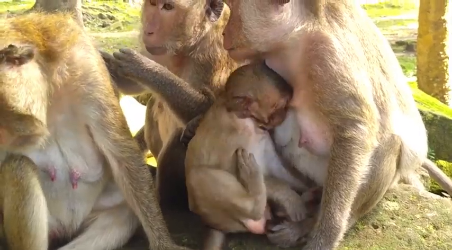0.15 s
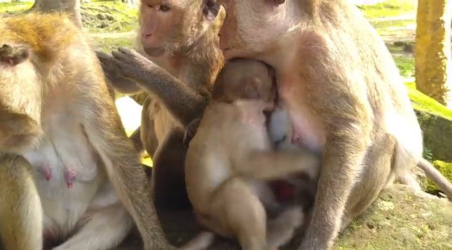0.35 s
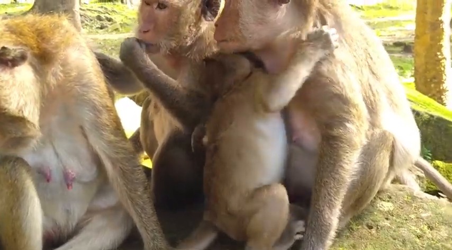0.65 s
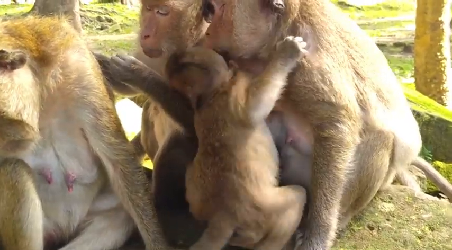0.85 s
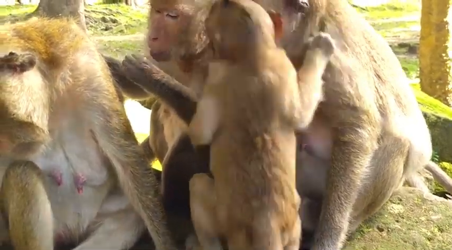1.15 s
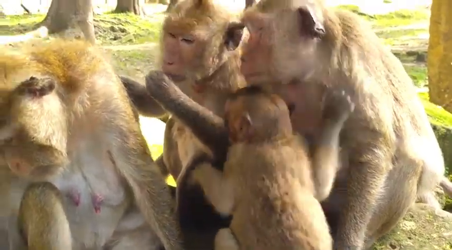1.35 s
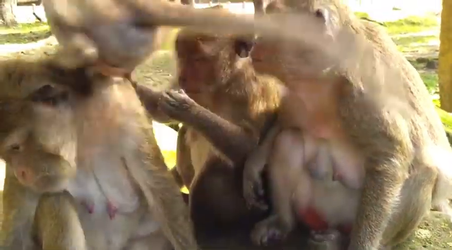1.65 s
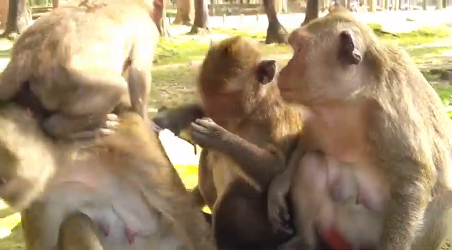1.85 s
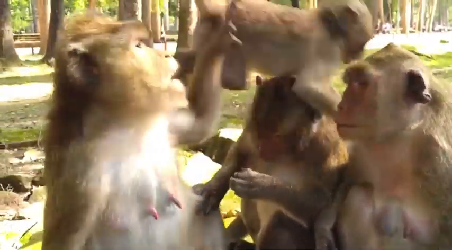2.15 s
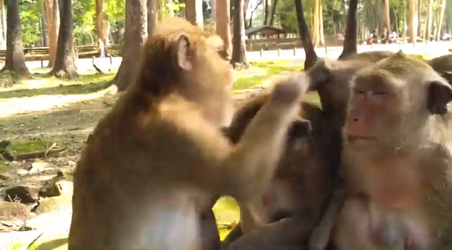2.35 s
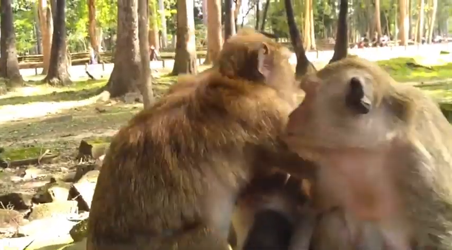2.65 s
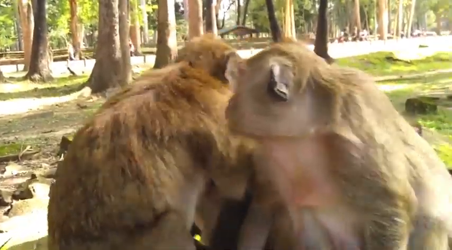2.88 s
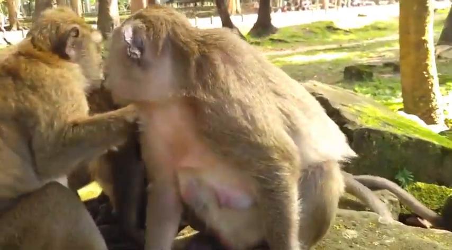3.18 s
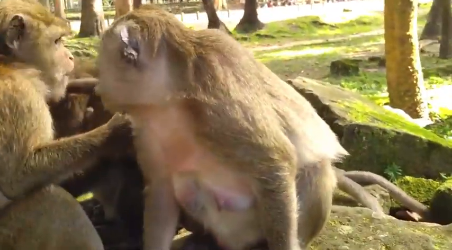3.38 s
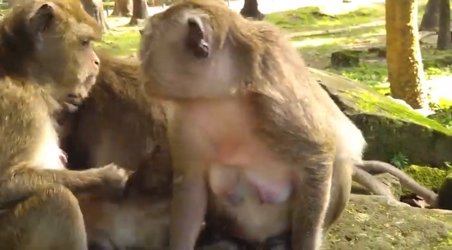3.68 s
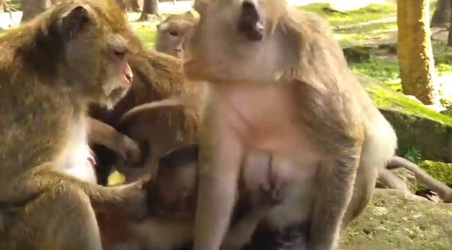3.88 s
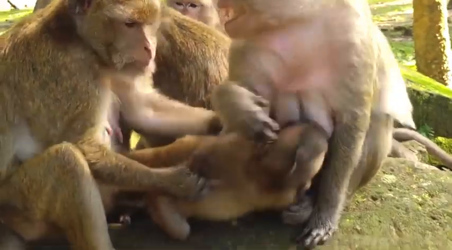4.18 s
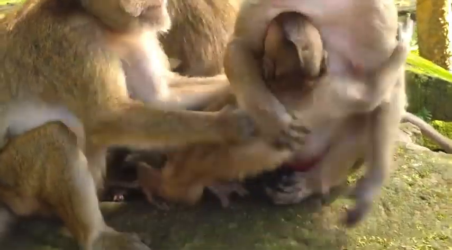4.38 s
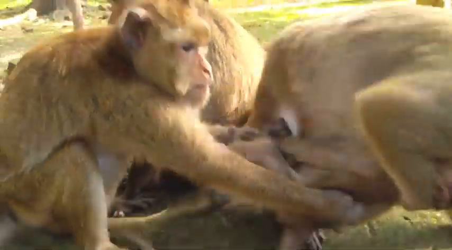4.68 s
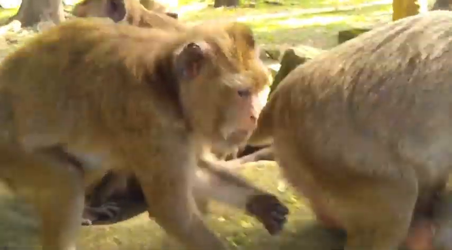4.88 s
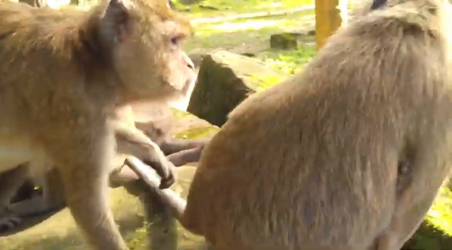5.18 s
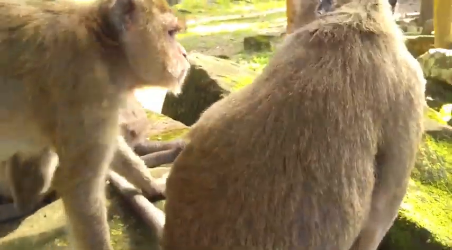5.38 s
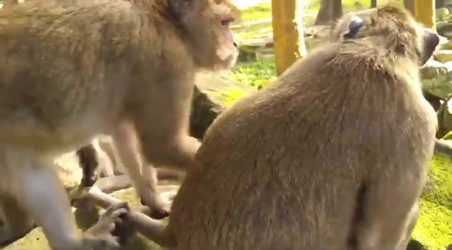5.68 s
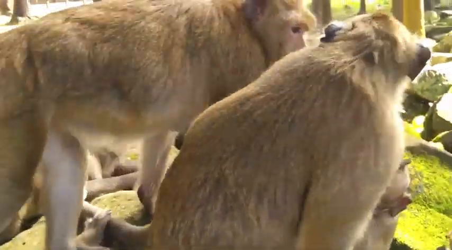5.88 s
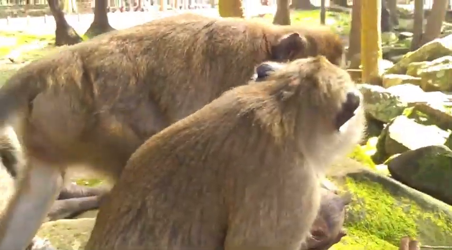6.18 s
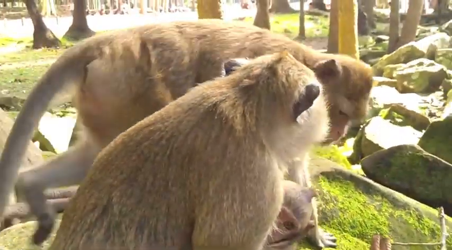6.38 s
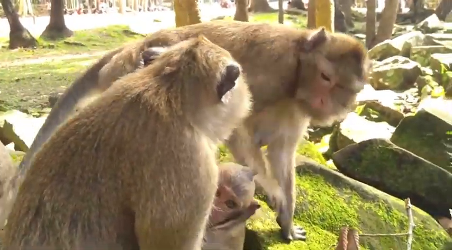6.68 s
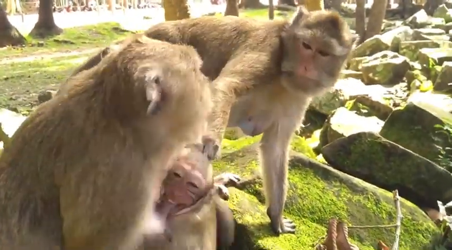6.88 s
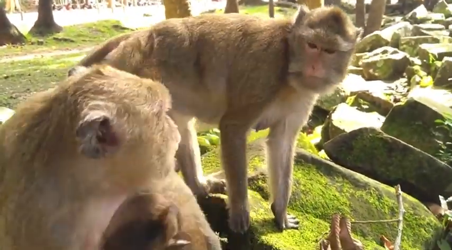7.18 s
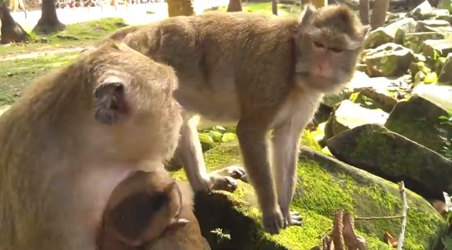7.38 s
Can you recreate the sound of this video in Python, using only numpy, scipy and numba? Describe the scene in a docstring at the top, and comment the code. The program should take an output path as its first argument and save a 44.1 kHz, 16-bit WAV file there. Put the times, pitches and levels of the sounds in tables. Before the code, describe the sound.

A young macaque close by lets out bursts of harsh, raspy screeches and tiny squeaks, over a faint low hum of distant traffic.

```python
"""Young macaque, close, wooded park

A young macaque screeches and squeaks at arm's length from a pair of microphone ports.
Its vocal folds blend a clear whistle-like tone (harmonics) with a chaotic rasp (uneven pulses and air noise).
The ground and bodies nearby echo at once; trunks and rocks send back a short tail of dying noise.
Fur and paws rustle now and then in puffs of noise; far traffic hums and rumbles behind in bands of noise."""
import sys
import numpy as np
from scipy import signal
from scipy.io import wavfile
from scipy.ndimage import map_coordinates
from numba import njit

SR = 44100
rng = np.random.default_rng(int(sys.argv[2]) if len(sys.argv) > 2 else 0)


def unload_audio(sound):
    """Save the sound as a 16-bit wav file, at the path given as the first command line argument."""
    columns = np.transpose(np.atleast_2d(sound))
    # keep every value between -1 and 1, then stretch to whole-number steps
    steps = np.round(np.clip(columns, -1, 1) * 32767)
    wavfile.write(sys.argv[1], SR, steps.astype(np.int16))


N = 332514   # length [samples]

# Short clear squeaks: (start [s], length [s], loudest point [share of length], first pitch [Hz],
# pitch at the loudest point [Hz], last pitch [Hz], top level [dB], shrillness [dB])
SQUEAKS = [(2.779, 0.023, .5, 2800, 2730, 2730, -42.5, -17), (3.416, 0.057, .7, 3470, 4080, 3900, -47, 8),
           (3.644, .03, 0.5, 1180, 1916, 4420, -39.5, -32), (3.677, 0.039, 0.1, 4160, 4700, 3350, -49, -10),
           (3.809, .03, 0.53, 3520, 3880, 3280, -51, -13), (4.003, .03, 0.6, 4760, 4100, 4100, -59, -12),
           (4.033, 0.015, 0.63, 2205, 2113, 1830, -37, -47),
           (5.16, 0.01, 0.38, 1140, 1250, 1250, -45, -37.5), (5.51, 0.019, .5, 2070, 2260, 2350, -53, -27),
           (5.536, 0.019, 0.48, 2500, 2000, 1680, -40, -45),
           (5.797, .016, 0.7, 1130, 1243, 1100, -25.5, -15.5),
           (5.809, 0.013, .4, 1152, 1070, 957, -28, -17),
           (6.844, 0.049, 0.95, 4050, 3750, 3630, -52.5, -23),
           (6.893, 0.0041, 0.7, 2590, 2500, 2550, -34, -30),
           (6.898, 0.035, 0.5, 4160, 4140, 4010, -34.5, -1), (6.93, .03, 0.3, 3600, 3750, 3900, -34, -15)]
SQUEAK_ROUGH, SQUEAK_EDGE_DB = .12, -16.5   # roughness 0-1; both ends relative to the top
# Throat colour of all squeaks, in the order of SCREECH_COLOUR from its second column on: [dB]
SQUEAK_THROAT_DB = (0.5, -23, -0.5, -6, -32)

# Effort, one list per screech: (time [s], level [dB], shrillness [dB])
SCREECH_EFFORT = [
    [(2.8, -31.5, -25.5), (2.814, -25, -17.5), (2.826, -24.5, -15.5), (2.838, -39.5, -40.5)],
    [(2.903, -29.5, -29), (2.909, -26, -14.5), (2.921, -17.5, -12), (2.959, -12, -6), (3.007, -16.5, -8),
     (3.021, -8, -22), (3.027, -16.5, -20.5), (3.038, -35.5, -19)],
    [(3.135, -47, -15), (3.139, -29.5, -22), (3.151, -29, -28), (3.177, -19.5, -4), (3.185, -19.5, -7),
     (3.203, -15.5, 11), (3.221, -16.5, 4), (3.267, -19.5, -8.5), (3.28, -41, 3)],
    [(3.458, -40, -7), (3.47, -38.5, -16), (3.496, -31, -10), (3.51, -31, -1), (3.522, -35.5, -7),
     (3.536, -25, -22), (3.546, -39.5, -10), (3.56, -47, -7)],
    [(4.214, -44.5, -1.5), (4.218, -33, -2), (4.248, -12, -1), (4.256, -9.5, 4), (4.318, -12.5, -33.5),
     (4.326, -21, -19.5), (4.33, -36, -19.5)],
    [(4.408, -49.5, -18), (4.42, -19, -39), (4.432, -22.5, -6), (4.448, -17.5, 0.5), (4.458, -22, 5.5),
     (4.474, -13, 7), (4.52, -14.5, -20), (4.528, -45.5, -17.5)],
    [(4.622, -40.5, -14), (4.64, -21, 0), (4.66, -11, -3), (4.696, -8, 2), (4.736, -14.5, -0.5),
     (4.758, -10.5, -11), (4.776, -30, -41), (4.783, -26, -18)],
    [(5.306, -45.5, -16), (5.32, -30.5, -12), (5.35, -29.5, 5.5), (5.364, -19.5, -8), (5.376, -32, 4),
     (5.396, -30, -18), (5.404, -26.5, -27), (5.408, -47, -17)],
    [(6.921, -34.5, -30.5), (6.931, -21, -20), (6.947, -22.5, -7), (6.983, -12, 3.5), (7.013, -16, -15),
     (7.025, -37.5, -4.5)],
]
# Vocal folds, one list per screech: (time [s], pitch [Hz], roughness [0-1, clipped above])
SCREECH_FOLDS = [
    [(2.8, 2237, .6), (2.812, 2450, .37), (2.828, 2390, .37), (2.838, 1996, .6)],
    [(2.903, 1095, .4), (2.915, 1430, .5), (2.93, 1505, .72), (2.965, 1404, .93), (3.018, 1350, 0.82),
     (3.028, 1150, 0.49), (3.038, 850, 0.2)],
    [(3.135, 1891, .4), (3.155, 2590, 0.64), (3.19, 2650, 0.84), (3.2, 2575, .95), (3.235, 2598, 1.17),
     (3.245, 2507, 0.6), (3.265, 2100, 0.6), (3.28, 1600, 0)],
    [(3.458, 1234, .3), (3.495, 1325, 0.31), (3.515, 1384, 0.28), (3.527, 1420, .6), (3.54, 1269, .6),
     (3.56, 1240, .9)],
    [(4.214, 3134, .07), (4.221, 3315, .13), (4.238, 2321, .4), (4.255, 2161, .22), (4.262, 2150, .75),
     (4.302, 1861, 0.7), (4.305, 1410, .5), (4.33, 1308, .3)],
    [(4.408, 2595, .05), (4.428, 3766, .4), (4.44, 3024, .9), (4.452, 1927, .2), (4.474, 2081, .4),
     (4.485, 2200, .8), (4.505, 2300, 1.08), (4.518, 2800, 0.5), (4.528, 2000, 0.72)],
    [(4.622, 1612, 0.5), (4.643, 2097, .6), (4.652, 1940, 1.04), (4.738, 1877, 0.93), (4.745, 2646, 0.56),
     (4.765, 2588, 0.3), (4.77, 1780, 0.2), (4.783, 1650, 0.32)],
    [(5.306, 720, .5), (5.325, 930, .4), (5.335, 890, 0.62), (5.355, 885, 0.58), (5.365, 934, 0.41),
     (5.388, 1080, 0.47), (5.4, 677, .1), (5.408, 610, .1)],
    [(6.921, 2500, 0), (6.935, 2600, 0.59), (6.964, 2560, .5), (6.972, 3050, 0.82), (7.0, 2884, .85),
     (7.017, 2662, 0.8), (7.025, 2000, .5)],
]
# Harmonic to which the clear voice tunes the mouth, one per screech: [harmonic number]
MOUTH_HARMONIC = [1, 2, 1, 2, 2, 1, 1, 3, 1]
# Vocal tract, one row per screech: (wide-open mouth [Hz], throat near 1.9 kHz [dB],
# near 1 kHz, rasp only [dB], near 3.8 kHz [dB], air above 8 kHz [dB], half-pitch lines [dB])
SCREECH_COLOUR = [(2297, -4.5, -5.5, -7.5, -5.5, -15.5), (2970, -12, -17, -9.5, -2, -20.5),
                  (2690, -7.5, -20, -1, 10.5, -2.5), (2630, -6.5, -11, -6, 15, -20),
                  (2800, -11.5, -38.5, -1.5, 13, -9), (2922, -5, -31, -3.5, 6, -4),
                  (2950, -20, -34, -0.5, 5.5, -0.5), (2720, -5.5, -28, -5, 12.5, -20),
                  (3130, -5, -32.5, -1.5, 0, -10)]

MOUTH_WIDTH_HZ, LOW_THROAT_HZ, MID_THROAT_HZ = 450, 1960, 3750
# Upper throat resonances, scaled by shrillness: (centre [Hz], width [Hz], relative level [dB])
UPPER_THROAT = [(4720, 1300, -8), (6400, 800, -5), (7260, 1100, -1.5)]
LEAK_DB = -40.5   # passes between the resonances of the clear voice, at the second harmonic
OPEN_AT_ROUGH = .85   # roughness at which the mouth is wide open
MOUTH_SHAKE, AIR_PER_DB = 0.031, .5   # mouth waver [share at full roughness]; air [dB per dB shrillness]

# Where the caller sits: (time [s], left lags right [ms], left minus right [dB])
CALLER_PLACE = [(2.8, 0.071, -8.5), (3.2, 0.06, -5), (3.5, 0.11, -7), (4.28, 0.027, -1.5),
                (4.47, 0.012, -9.5), (4.7, 0.15, -6), (5.35, 0.1, -3), (5.8, .1, -10.5),
                (6.95, -0.069, -7.5)]
# Echoes off ground and bodies: (left delay [ms], right delay [ms], level [dB])
NEAR_ECHOES = [(.4, .55, -11), (.9, .7, -15.5), (1.5, 1.9, -13)]
# Tail from trunks and rocks: (band centre [Hz], time to fall by 60 dB [s], level [dB])
GROVE_TAIL = [(1600, 0.084, -28.5), (2400, 0.28, -34.5), (3840, 0.15, -28.5), (5745, 0.13, -25),
              (8500, .1, -24.5), (12200, 0.13, -12)]

# Fur and paws: (time [s], level [dB])
RUSTLES = [(1.489, -46.5), (1.8, -52), (2.31, -51.5)]

# Far traffic: (time [s], drone level [dB], rumble level [dB])
TRAFFIC_LEVELS = [(0.0, -42.5, -45.5), (0.65, -40, -41.5), (1.05, -43.5, -53.5), (1.78, -44.5, -48),
                  (2.04, -44.5, -48.5), (3.72, -48.5, -50), (4.74, -49.5, -58.5), (6.15, -50, -54),
                  (6.59, -49.5, -60), (6.85, -51, -55.5), (7.54, -51, -52)]
WASH_DB, WASH_FOLLOWS = -56, 1.2   # tyre wash at mean drone level; share of the drone's swing in dB
# Engine rumble spectrum: (frequency [Hz], relative density [dB per Hz])
RUMBLE_SPECTRUM = [(15, -62), (25, -44.5), (49, -18.5), (79, -7), (130, 10.5), (147, 5), (172, -3.5),
                   (220, -18), (290, -32), (480, -120)]
# Exhaust drone spectrum: (frequency [Hz], relative density [dB per Hz])
DRONE_SPECTRUM = [(120, -38), (200, -8), (286, -6.5), (367, -2), (477, -5.5), (560, 3), (790, -1.5),
                  (874, -3), (1000, -4), (1300, -44), (2200, -120)]
# Tyre wash spectrum: (frequency [Hz], relative density [dB per Hz])
WASH_SPECTRUM = [(590, -30.5), (1000, 6.5), (1410, 4.5), (2580, -1), (3850, -41.5), (4230, -52.5),
                 (5000, -41), (6500, -68.5), (11000, -120)]
# Faint motor tones, silent if the end precedes the start:
# (start [s], end [s], centre [Hz], width [Hz], level [dB])
MOTOR_TONES = [(0.4, 0.58, 110, 11, -64), (4.9, 6.75, 373, 12.4, -56.5), (7.2, 6.45, 2000, 22, -51),
               (0.316, 0.807, 600, 26, -43.5), (0.33, 0.71, 1600, 38, -57.5)]
# Likeness of left and right in the noise beds: (frequency [Hz], correlation [-1 to 1])
STEREO_LIKENESS = [(60, 1), (120, 0.96), (240, 1), (480, 0.8), (950, -0.14), (1890, -0.11), (3770, 0.3),
                   (7520, .2), (15000, .2)]

# Microphone self-noise spectrum: (frequency [Hz], relative density [dB per Hz])
HISS_SPECTRUM = [(2650, -27.5), (4500, -11.5), (5210, -2), (5650, 4.5), (8420, 0.5), (13000, 3),
                 (15000, -8), (17000, -8)]
HISS_DB = -79
MIC_STEP_HZ, MIC_STEP_DB, CUTOFF_HZ = 7650, -13, 15780   # the port dulls from the step up to the cutoff


def from_db(db):
    """Decibels to an amplitude factor."""
    return np.exp(np.asarray(db) * np.log(10) / 20)


def rms_one(x):
    """Scale to an rms of 1."""
    return x / np.sqrt(np.mean(x ** 2) + 1e-20)


def in_time(rows):
    """Columns of a table at every sample."""
    s, *columns = np.transpose(rows)
    return [np.interp(np.arange(N) / SR, s, c) for c in columns]


def at_hz(points, hz):
    """Second column of a table at hz, on a logarithmic frequency scale."""
    table = np.array(points)
    return np.interp(np.log(hz), np.log(table[:, 0]), table[:, 1])


def drift(rate_hz, size=N):
    """Random wander in size steps over the whole time: noise twice through a one-pole low-pass; rms 1."""
    r = np.exp(-2 * np.pi * rate_hz * N / size / SR)
    noise = rng.standard_normal(size + 4000)
    settled = signal.lfilter([1], [1, -2 * r, r * r], noise)[4000:]
    return rms_one(settled)


def band(x, low_hz, high_hz, order=2):
    """Butterworth band-pass."""
    edges = [low_hz, min(high_hz, .45 * SR)]
    return signal.sosfilt(signal.butter(order, edges, "band", fs=SR, output="sos"), x)


def peak_gain(hz, centre_hz, width_hz):
    """Height of a resonance curve at hz, 1 on top."""
    return 1 / np.sqrt(1 + ((hz - centre_hz ** 2 / hz) / width_hz) ** 2)


@njit
def moving_resonance(x, hz, width_hz, sr):
    """Two-pole resonance whose centre follows hz."""
    out, r = np.zeros(len(x)), np.exp(-np.pi * width_hz / sr)
    for i in range(2, len(x)):
        drive = (1 - r * r) / 2 * (x[i] - x[i - 2])
        out[i] = drive + 2 * r * np.cos(2 * np.pi * hz[i] / sr) * out[i - 1] - r * r * out[i - 2]
    return out


def macaque():
    """Each call blends clear and chaotic folds; roughness adds shake to clear pitch, mouth and level."""
    out = np.zeros(N)
    shake, waver, throb = drift(150), drift(70), drift(110)
    breath = rng.standard_normal((2, N))
    screeches = zip(SCREECH_EFFORT, SCREECH_FOLDS, MOUTH_HARMONIC, SCREECH_COLOUR)
    calls = [squeak_controls(*row) for row in SQUEAKS]
    calls += [screech_controls(*row) for row in screeches]
    for at, pitch, level_db, rough, mouth_hz, shrill_db, throat_db in calls:
        shrill = from_db(shrill_db)
        mouth_hz = mouth_hz * np.exp(MOUTH_SHAKE * rough * waver[at])
        *throat, air, half_pitch = from_db(throat_db)
        air = air * from_db(AIR_PER_DB * (shrill_db - shrill_db.max()))
        throat += [air, half_pitch * rough]

        shaken_pitch = pitch * (1 + rough * (0.033 * shake[at] + .04 * waver[at]))
        clear = clear_voice(shaken_pitch, mouth_hz, shrill, [rough * g for g in throat])
        chaos = rasp(pitch * np.exp(.12 * shake[at]), mouth_hz, shrill, throat, breath[:, at])
        voice = np.sqrt(1 - rough ** 2) * clear + rough * chaos
        swell = from_db(level_db + 1.5 * rough * throb[at])
        out[at] += voice * swell * signal.windows.tukey(len(at), .08)
    return out


def screech_controls(effort, folds, harmonic, colour):
    """The rougher the voice, the more the mouth leaves its harmonic for the wide-open resonance."""
    s, *columns = np.transpose(effort)
    at = np.arange(int(s[0] * SR), int(s[-1] * SR))
    level_db, shrill_db = [np.interp(at / SR, s, c) for c in columns]
    s, *columns = np.transpose(folds)
    pitch, rough = [np.interp(at / SR, s, c) for c in columns]
    rough = np.clip(rough, 0, 1)
    open_hz, *throat_db = colour
    opening = np.minimum(rough / OPEN_AT_ROUGH, 1) ** 2
    mouth_hz = harmonic * pitch + opening * (open_hz - harmonic * pitch)
    return at, pitch, level_db, rough, mouth_hz, shrill_db, throat_db


def squeak_controls(start, length, top, first_hz, top_hz, last_hz, level_db, shrill_db):
    """A glide through three pitches under a rounded swell; the mouth sits on the pitch."""
    at = np.arange(int(start * SR), int((start + length) * SR))
    share, top = np.linspace(0, 1, len(at)), np.clip(top, .05, .95)
    away = np.where(share < top, 1 - share / top, (share - top) / (1 - top))
    pitch = np.interp(share, [0, top, 1], [first_hz, top_hz, last_hz])
    swell_db = level_db + SQUEAK_EDGE_DB * away ** 2
    steady = np.ones(len(at))
    return at, pitch, swell_db, SQUEAK_ROUGH * steady, pitch, shrill_db * steady, SQUEAK_THROAT_DB


def clear_voice(pitch, mouth_hz, shrill, throat):
    """Regular folds: harmonics weighed by the tract; strong-weak cycles add half-pitch lines; rms near 1."""
    phase = 2 * np.pi * np.cumsum(pitch) / SR
    out, power = 0, 0
    for k in np.arange(1, 21) / 2:   # every other step lies between two harmonics
        hz = k * pitch
        mouth = peak_gain(hz, mouth_hz, MOUTH_WIDTH_HZ) ** 2
        upper = sum(from_db(db) * peak_gain(hz, top_hz, width_hz) ** 2
                    for top_hz, width_hz, db in UPPER_THROAT)
        lower = throat[0] * peak_gain(hz, LOW_THROAT_HZ, 500) ** 2
        lower = lower + throat[2] * peak_gain(hz, MID_THROAT_HZ, 920) ** 2
        leak = from_db(LEAK_DB) * (2 / np.ceil(k)) ** 2
        gain = (mouth + 0.57 * shrill * upper + lower + leak) * (hz < .4 * SR)
        gain = gain * (throat[4] if k % 1 else 1)
        out = out + gain * np.sin(k * phase)
        power = power + gain ** 2 / 2
    return out / np.sqrt(power)


def rasp(pitch, mouth_hz, shrill, throat, breath):
    """Chaotic folds: closures of uneven spacing and size plus air noise, rung through a like tract."""
    cycles = np.cumsum(pitch / SR)
    closures = np.diff(np.floor(cycles), prepend=0) * np.sqrt(SR / pitch)
    source = closures * (0.8 + 0.7 * breath[0]) + 0.39 * breath[1]
    mouth = moving_resonance(source, mouth_hz, MOUTH_WIDTH_HZ, SR)
    mouth = moving_resonance(mouth, mouth_hz, 2 * MOUTH_WIDTH_HZ, SR)
    upper = sum(from_db(db) * band(source, hz - width_hz / 2, hz + width_hz / 2)
                for hz, width_hz, db in UPPER_THROAT)
    leak = from_db(-20.5) * rms_one(band(source, 2000, 5300))
    colour = throat[0] * rms_one(band(source, 1740, 2300))
    colour += throat[1] * rms_one(band(source, 730, 1700))
    colour += throat[2] * rms_one(band(source, 3300, 4300))
    colour += throat[3] * rms_one(band(source, 7900, 14500))   # air
    return (rms_one(mouth) + shrill * rms_one(upper) + leak + colour) / np.sqrt(1 + shrill ** 2)


def at_ports(x):
    """Direct sound reaches the two ports with a lag and a level step; near echoes tint each side."""
    lag_ms, pan_db = in_time(CALLER_PLACE)
    left = map_coordinates(x, [np.arange(N) - lag_ms * SR / 1000], order=3)
    out = np.array([left, x])
    for left_ms, right_ms, level_db in NEAR_ECHOES:
        left_echo = np.roll(left, int(left_ms * SR / 1000))
        right_echo = -np.roll(x, int(right_ms * SR / 1000))   # opposite polarity
        out += from_db(level_db) * np.array([left_echo, right_echo])
    return out * from_db([pan_db / 2, -pan_db / 2])


def grove(x):
    """Scattering off trunks and rocks: noise that dies band by band, its own on each side."""
    t = np.arange(SR // 2) / SR
    white = rng.standard_normal((len(GROVE_TAIL), 2, len(t)))
    tail = 0
    for (hz, t60, level_db), noise in zip(GROVE_TAIL, white):
        part = band(noise, hz / 1.25, hz * 1.25)
        dying = part * from_db(-60 * t / t60) * np.minimum(t / 0.0017, 1)   # 1.7 ms rise
        tail = tail + from_db(level_db) * dying / np.sqrt(np.sum(dying ** 2) * hz / SR)
    return signal.fftconvolve(x[None], tail, axes=1)[:, :N]


def rustles():
    """Fur and paws: short dry puffs of band-passed noise with a sudden start and a decay."""
    t = np.arange(N) / SR
    noise = rms_one(band(rng.standard_normal((2, N)), 1900, 2920))
    puffs = sum(from_db(db - 60 * np.maximum(t - s, 0) / 0.22) * (t > s) for s, db in RUSTLES)
    return noise * puffs


def traffic():
    """Engines rumble, exhausts drone, tyres wash; a few tones stand out for a while."""
    drone_db, rumble_db = in_time(TRAFFIC_LEVELS)
    wash_db = WASH_DB + WASH_FOLLOWS * (drone_db - drone_db.mean())
    out = from_db(rumble_db) * banded_noise(RUMBLE_SPECTRUM, patchy_db=1.0)
    out += from_db(drone_db) * banded_noise(DRONE_SPECTRUM, patchy_db=1.63)
    out += from_db(wash_db) * banded_noise(WASH_SPECTRUM, patchy_db=0.47)
    t = np.arange(N) / SR
    for start, end, hz, width_hz, level_db in MOTOR_TONES:
        swell = np.clip(np.minimum(t - start, end - t) / 0.011, 0, 1)   # 11 ms fades
        tone = rms_one(band(rng.standard_normal(N), hz - width_hz / 2, hz + width_hz / 2))
        out += from_db(level_db) * swell * tone
    return out


def banded_noise(spectrum, patchy_db):
    """Third-octave bands of stereo noise, each with its own level, flicker and likeness; mono rms 1."""
    out, edges = 0, 25 * 2 ** np.arange(0, 9.4, 1 / 3)
    white = rng.standard_normal((2, 2, N))   # neighbouring bands take turns
    together = drift(6.4, size=N // 50)   # flicker shared by all bands
    for k, (low, high) in enumerate(zip(edges, edges[1:])):
        hz = np.sqrt(low * high)
        if spectrum[0][0] < hz < spectrum[-1][0]:
            mid, side = band(white[k % 2], low, high)
            alike = np.clip(at_hz(STEREO_LIKENESS, hz), -1, 1)
            flicker_db = patchy_db * (1.5 * together + drift(17, size=N // 50))
            gain = from_db(at_hz(spectrum, hz) + flicker_db)
            gain = np.interp(np.arange(N) / 50, np.arange(len(gain)), gain)
            stereo = np.sqrt(1 + alike) * mid + np.sqrt(1 - alike) * side * [[1], [-1]]
            out = out + gain * stereo
    return out / np.sqrt(np.mean(out.mean(0) ** 2))


def scene():
    """The caller up close, its tail from the grove, far traffic and rustles."""
    voice = macaque()
    return at_ports(voice) + grove(voice) + traffic() + rustles()


def record(dry):
    """The port dulls the treble, the microphone hisses, the loudest peaks are squashed, the top is cut."""
    below_filter = signal.ellip(6, .3, 40, MIC_STEP_HZ, fs=SR, output="sos")
    above_filter = signal.ellip(4, .3, 40, 1.04 * MIC_STEP_HZ, "high", fs=SR, output="sos")
    below = signal.sosfilt(below_filter, dry)
    above = signal.sosfilt(above_filter, dry)
    wet = below + from_db(MIC_STEP_DB) * above
    # the capsule bends unevenly: a low thud under loud calls
    wet += from_db(-34.5) * band(wet ** 2, 18, 400, order=1)
    wet += from_db(HISS_DB) * banded_noise(HISS_SPECTRUM, patchy_db=1.35)
    squashed = wet / (1 + np.abs(wet) ** 5) ** (1 / 5)
    return signal.sosfilt(signal.ellip(12, .5, 80, CUTOFF_HZ, fs=SR, output="sos"), squashed)


dry = scene()
out = record(dry)
unload_audio(out)
```